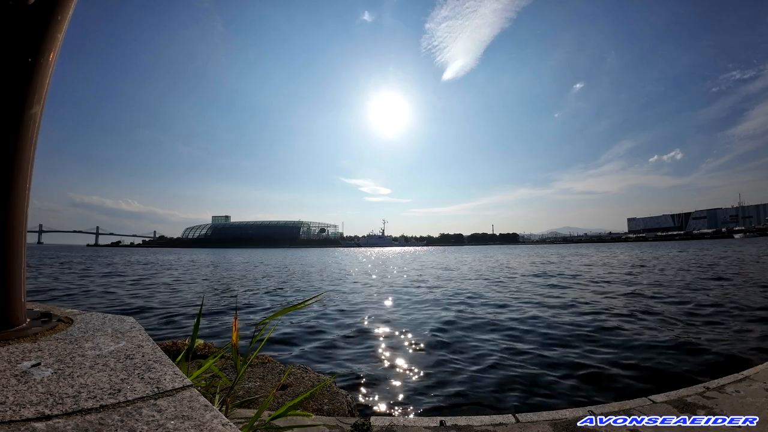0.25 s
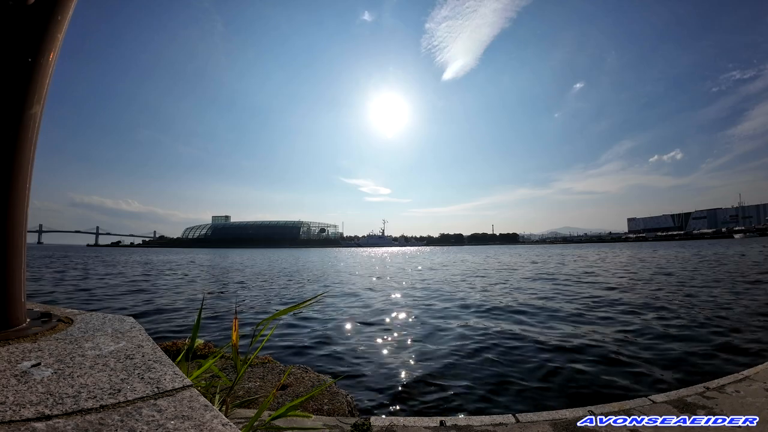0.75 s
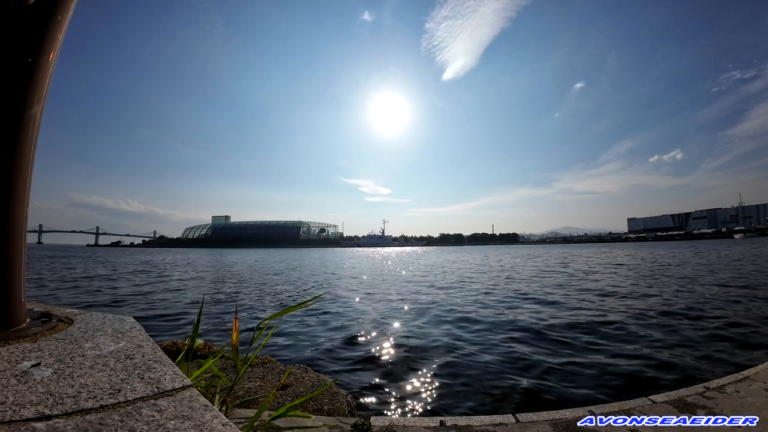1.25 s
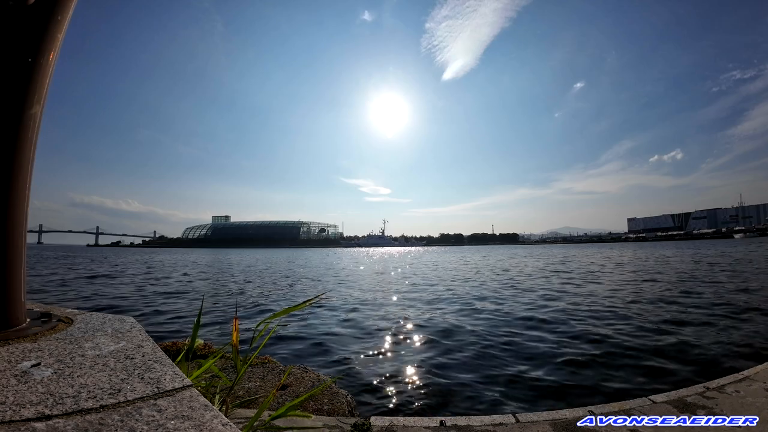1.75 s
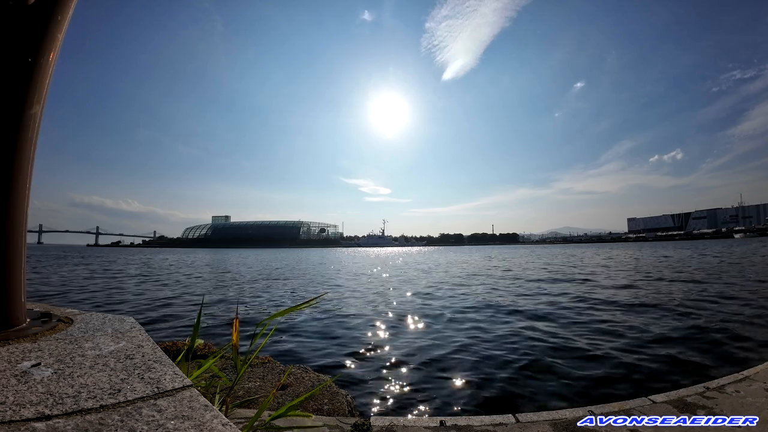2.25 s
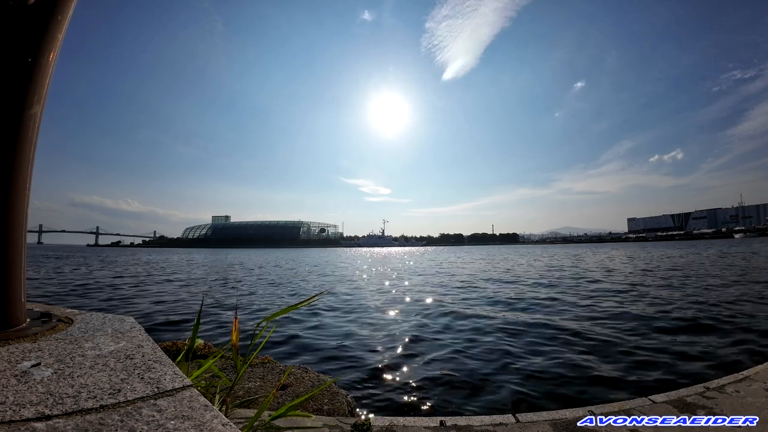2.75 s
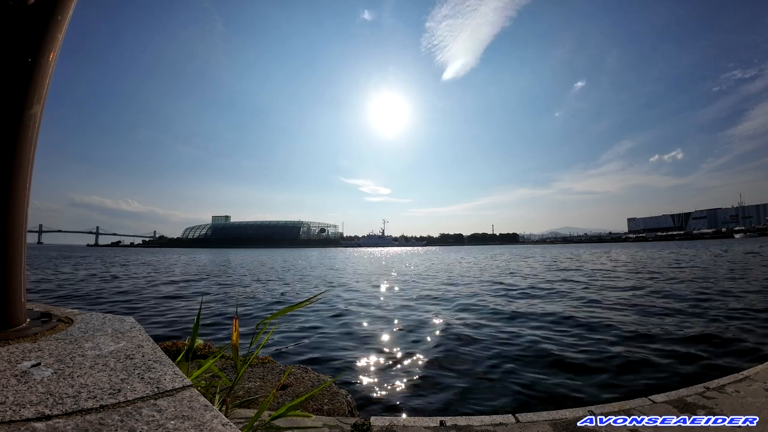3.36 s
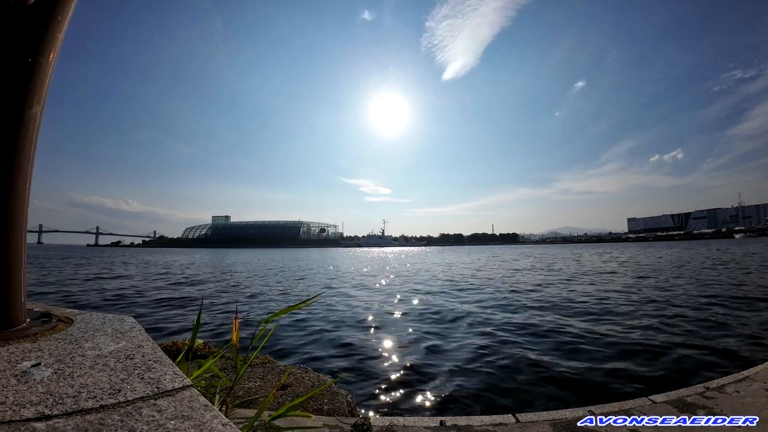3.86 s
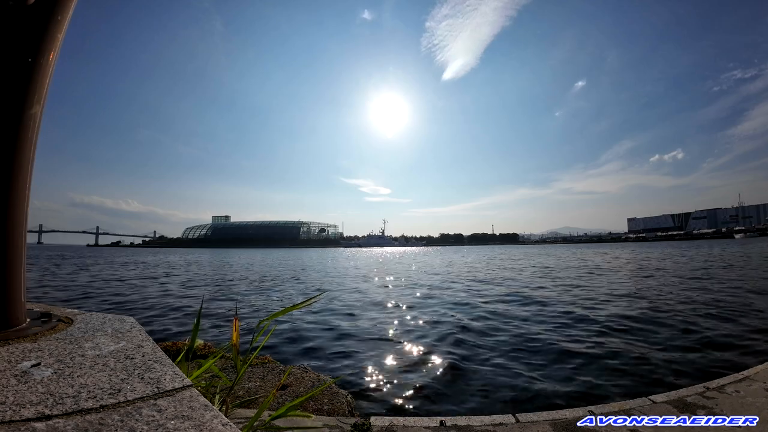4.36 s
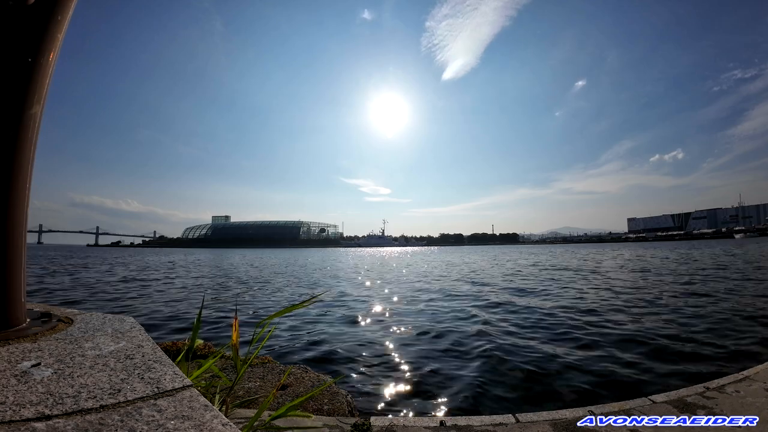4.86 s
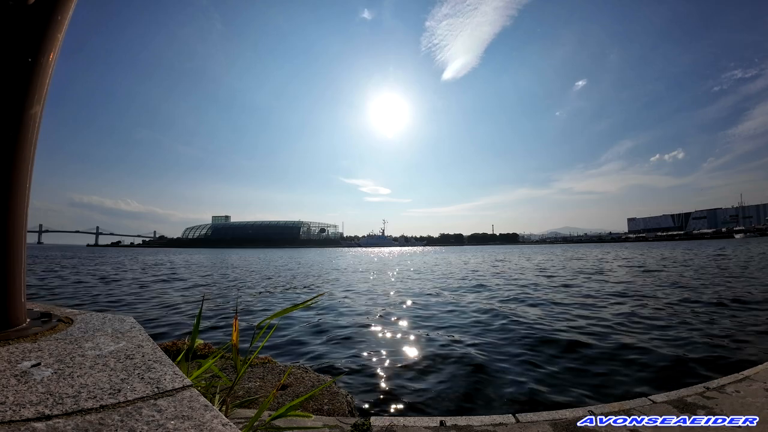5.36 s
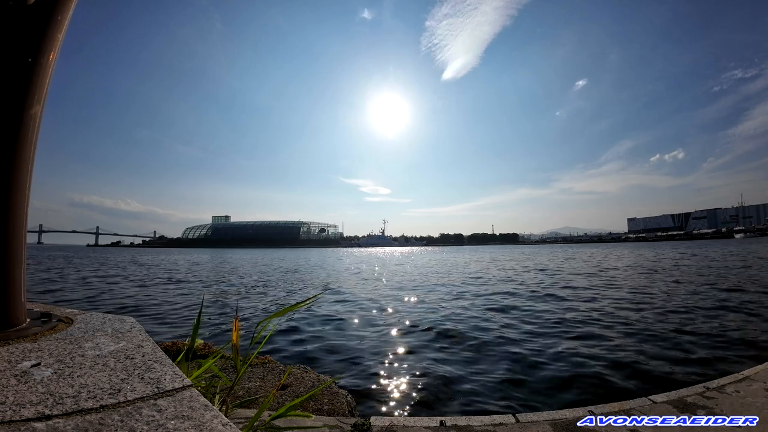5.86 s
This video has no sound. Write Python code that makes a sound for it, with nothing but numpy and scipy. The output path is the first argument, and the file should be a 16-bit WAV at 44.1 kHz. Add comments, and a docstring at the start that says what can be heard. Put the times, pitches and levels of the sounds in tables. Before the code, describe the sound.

Throughout six seconds, distant ship engines hold a deep, slowly beating hum under a dark, wide port roar, with a faint hollow low note swelling in the first two seconds. Close by, water gurgles almost inaudibly along stone. A small bubbly lap opens the scene, and fine drops tick at 0.7-0.9. Far off, a bird of prey whistles from 0.35, flicking up and holding a pure high tone until about 1.0, then warbling in quick arches until 2.3. Faint buzzy chips from a small bird come at 0.3, 0.65, 1.5, 1.75 and 2.35. Ripples and rounder plops return at 2.3-2.8; the busiest splashing is 3.45-4.0, with lighter laps near 4.2, 4.4 and 4.7 and a spattering one at 5.1-5.5. Soft wind puffs rumble on the microphone, notably at 0.9, 2.3-2.7, 3.7 and most strongly 5.65. Open air, little echo, drone continuing to the end.

```python
"""A quiet harbour quay. Far ship engines drone as steady low tones that beat, under the port's dark noise roar.
Ripples lap the stone as swarms of ringing bubbles, and throw small drops made of short band-passed splats.
Light air brushes the microphone as a lumpy rumble, unlike in the two ears. Far off a bird of prey gives
one long pure whistle that breaks into a warble, and a small bird chips a few times in buzzy tones."""
import sys
import numpy as np
from scipy import signal
from scipy.fft import rfft, irfft
from scipy.io import wavfile
from scipy.ndimage import uniform_filter1d

SR = 44100
rng = np.random.default_rng(int(sys.argv[2]) if len(sys.argv) > 2 else 0)


def file_out(sig):
    """Save sig as 16-bit WAV at sys.argv[1]."""
    # one column per channel
    cols = np.atleast_2d(sig).T
    # limit, then scale
    lim = np.clip(cols, -1, 1)
    pcm = np.round(lim * 32767).astype(np.int16)
    wavfile.write(sys.argv[1], SR, pcm)


N = 269010
TIME = np.arange(N) / SR
EDGE_HZ = 15700  # upper band limit of the whole scene

# Ripples reaching the wall. Each row: start in seconds, length in seconds, level of the bubbles in dB before
# the trim in laps(), middle pitch of the bubbles in Hz, level of the spray in dB before the trim in spray().
RIPPLES = [(-.05, 0.17, -67.5, 2860, -75), (0.14, 0.2, -73, 2450, -91), (0.679, .27, -72, 3100, -72),
           (2.294, .2, -67.5, 2200, -86), (2.478, .34, -79.5, 2700, -83), (3.455, .28, -73, 3050, -74),
           (3.767, 0.27, -72, 3130, -68), (4.179, .2, -71, 1870, -91), (4.411, 0.28, -73.5, 3200, -88),
           (4.666, .2, -71.5, 2900, -77), (5.12, .4, -73, 3220, -72)]
# Where drops fall. Each row: pitch in Hz, left minus right in dB; the finest fall to the right.
DROP_PLACES = [(2500, -0.5), (4500, 1), (8000, -3.5)]


def gain_of(db):
    """Decibels to amplitude."""
    return 10 ** (np.asarray(db) / 20)


def evened(x):
    """Scales to rms 1."""
    return x / np.sqrt(np.mean(x ** 2) + 1e-20)


def curve(points, t=TIME):
    """Reads a control curve over time."""
    return np.interp(t, *np.transpose(points))


def read(points, hz):
    """Reads a spectrum on a log-frequency axis."""
    f, value = np.transpose(points)
    return np.interp(np.log(hz + 1), np.log(f + 1), value)


def shaped(x, points):
    """Filters a sound by a spectrum in dB, leaving phase alone."""
    return irfft(rfft(x) * gain_of(read(points, np.fft.rfftfreq(N, 1 / SR))), N)


def drift(hz):
    """Slow random motion of rms 1, up to about hz changes a second."""
    f = np.fft.rfftfreq(N, 1 / SR)
    low_pass = np.exp(-.5 * (f / hz) ** 2) * (f > 0)
    return evened(irfft(rfft(rng.standard_normal(N)) * low_pass, N))


def band(x, hz, octaves):
    """Band-pass that reaches the given octaves to either side of hz, within 20 Hz to 12 kHz."""
    edges = np.clip([hz / 2 ** octaves, hz * 2 ** octaves], [20, 40], [11000, 12000])
    return signal.sosfilt(signal.butter(2, edges, "bandpass", fs=SR, output="sos"), x)


def panned(x, side_db):
    """Places a sound by its level difference, left minus right."""
    return x * gain_of([[side_db / 2], [-side_db / 2]])


def add(mix, s, sound):
    """Mixes a sound in at time s, trimming what falls outside."""
    start = round(s * SR)
    sound = sound[..., max(-start, 0):]
    part = mix[..., max(start, 0):][..., :sound.shape[-1]]
    part += sound[..., :part.shape[-1]]


def engines(wander_hz=0.075, throb_depth=0.88, flutter_db=0.6, side_db=-1.9):
    """Near-steady engine tones whose sum beats; the first one also throbs."""
    # Engine tones, strongest first. Each row: pitch in Hz, level in dB.
    tones = [(58.6, -35.5), (44.44, -43), (40.4, -48), (60.3, -49), (56.3, -54.5), (141, -60.5),
             (162.5, -62)]
    # Slow swell of the strongest tone. Each row: time in seconds, level in dB; only its shape about the mean
    # counts, scaled by throb_depth.
    throb = [(0, -37.5), (.35, -34.5), (.95, -37.5), (1.15, -35.5), (2.9, -37), (3.25, -31), (3.52, -40),
             (3.9, -35), (4.25, -38), (4.8, -34), (5.15, -37.5), (5.8, -40), (6.0, -32)]
    throb_db = curve(throb)
    out = np.zeros((2, N))
    for k, (hz, db) in enumerate(tones):
        turns = np.cumsum(hz + wander_hz * drift(0.81)) / SR + rng.random()
        tone = evened(np.sin(2 * np.pi * turns))
        swell_db = 0
        if k == 0:
            swell_db = throb_depth * (throb_db - throb_db.mean()) + flutter_db * drift(9.7)
        lean_db = side_db if hz < 100 else 0  # deep tones lean right
        out += panned(gain_of(db + swell_db) * tone, lean_db)
    return out


def pipe_note(hz=178, width_hz=4.8):
    """A hollow note in the rumble: a tone whose amplitude and phase wander like narrow-band noise."""
    # Each row: time in seconds, level in dB.
    boom = [(0, -57), (.5, -48), (1.3, -54), (1.75, -46.5), (2.2, -56.5), (2.5, -62), (6.1, -73)]
    turn = 2 * np.pi * hz * TIME
    pipe = np.sin(turn) * drift(width_hz) + np.cos(turn) * drift(width_hz)
    return panned(evened(pipe) * gain_of(curve(boom)), 0)


def roar(level_db=-40.5, patchy_db=1.0, bass_side_db=0.5):
    """Far traffic and machinery: dark noise, its bass alike in both ears, whose rumble and middle swell apart."""
    # Tone of the roar. Each row: frequency in Hz, relative density in dB per Hz.
    tilt = [(12, -13), (50, -6), (90, -5), (150, -13.5), (320, -19), (440, -25.5), (900, -32.5),
            (1900, -44), (2500, -47.5), (3400, -52), (4300, -59.5), (5200, -57), (6900, -66), (15000, -73)]
    # Swell of the low rumble. Each row: time in seconds, level in dB; only its shape about the mean counts.
    rumble = [(0, -46.5), (.45, -44), (1.5, -46.5), (1.85, -44.5), (2.3, -46.5), (3.4, -50), (4.6, -48),
              (6.1, -49)]
    # Swell of the distant traffic. Each row: time in seconds, level in dB; only its shape about the mean counts.
    traffic = [(0, -59), (.9, -58.5), (1.7, -60.5), (2.7, -59.5), (3.3, -61), (3.6, -59), (5.3, -58.5),
               (5.7, -61), (6.1, -60)]
    # Stereo width. Each row: frequency in Hz, side minus mid in dB.
    width = [(40, -15.5), (80, -18.5), (150, -27), (250, -28), (500, -20), (1000, -17), (2000, -11),
             (4000, -3.5), (7000, 1)]
    hz = np.fft.rfftfreq(4096, 1 / SR)
    t = np.arange(N // 1024 + 5) * 1024 / SR
    a, b, c, d, patches = rng.standard_normal((5, len(hz), len(t)))
    patches = uniform_filter1d(uniform_filter1d(patches, size=30, axis=0), size=6, axis=1)
    field_db = read(tilt, hz)[:, None] + patchy_db * evened(patches)

    # how far each swell reaches: (Hz, share of the swell)
    rumble_reach = [(50, 0.22), (150, 1), (260, 0.81), (700, 0.031)]
    traffic_reach = [(300, 0.097), (900, 0.6), (2200, 1.0), (6000, 0.74)]
    for points, reach in ((rumble, rumble_reach), (traffic, traffic_reach)):
        swell_db = curve(points, t)
        field_db = field_db + read(reach, hz)[:, None] * (swell_db - swell_db.mean())

    mid = a + 1j * b
    side = (c + 1j * d) * gain_of(read(width, hz))[:, None]
    spectra = np.array([mid + side, mid - side]) * gain_of(field_db)
    lean_db = read([(60, bass_side_db), (160, .2)], hz)
    spectra *= gain_of(np.outer([.5, -.5], lean_db))[:, :, None]
    noise = signal.istft(spectra, nperseg=4096, noverlap=3072)[1][:, :N]
    return gain_of(level_db) * evened(noise)


def drop(hz, octaves, swell_s=.00085, apart=0.76):
    """One drop: a splat that swells and dies in milliseconds, ringing longer the narrower it is."""
    t = np.arange(1024) / SR
    trickle = gain_of(-23) * np.exp(-t / .006)
    splat = rng.standard_normal((3, len(t))) * (t / swell_s * np.exp(-t / swell_s) + trickle)
    unlike = np.clip(apart * hz / 6000, 0, 1)  # the ears differ more for short waves
    both_ears = np.sqrt(1 - unlike ** 2) * splat[0] + unlike * splat[1:]
    sound = band(both_ears, hz, 0.035 + max(octaves, 0))
    return sound / np.sqrt(np.mean(sound[:, :220] ** 2))  # rms 1 over the first 5 ms


def drops():
    """The larger drops against the stone, close to the microphone."""
    # Each row: start in seconds, level in dB, pitch in Hz, spread in octaves to either side before the
    # small minimum that drop() adds.
    loud_drops = [(.052, -64.5, 3780, 0.29), (0.71, -59.5, 8700, .53), (0.767, -67, 7490, .6),
                  (.787, -60.5, 3030, 0.3), (0.845, -66, 6200, .48), (.882, -63, 9700, .1),
                  (0.893, -60, 9400, .2), (.924, -68, 3330, .3), (1.65, -63.5, 3000, 0.26),
                  (1.713, -75, 11500, .15), (2.423, -56, 2150, 0.11), (2.463, -60, 1690, .12),
                  (2.548, -61, 2350, 0.096), (2.743, -59, 4030, .37), (2.985, -71, 4960, .22),
                  (3.124, -64, 2800, 0.23), (3.292, -68, 3940, .25), (3.476, -58, 2260, 0.19),
                  (3.503, -73, 6760, .4), (3.56, -59, 3350, .13), (3.568, -68, 5000, 1.2),
                  (3.605, -53.5, 2960, 0.19), (3.668, -58, 5700, .39), (3.673, -56, 2310, 0.54),
                  (3.677, -57.5, 4460, .2), (3.684, -63, 8180, 0.25), (3.814, -56.5, 2580, 0.38),
                  (3.858, -62.5, 8260, 0.094), (3.914, -61, 5350, 0.14), (3.933, -64, 4460, .4),
                  (3.948, -67, 6740, 0.56), (4.021, -70, 5630, 0.7), (4.221, -59.5, 2150, 0.077),
                  (4.436, -70, 5930, 0.35), (4.822, -67, 4840, .44), (5.144, -64, 4940, .4),
                  (5.182, -67.5, 8220, 0.35), (5.295, -62, 9300, 0.19), (5.337, -60.5, 3550, 0.97),
                  (5.354, -66, 4960, .3), (5.388, -59, 3800, 0.24), (5.649, -69.5, 5600, .44)]
    out = np.zeros((2, N))
    for s, db, hz, octaves in loud_drops:
        add(out, s, panned(gain_of(db) * drop(hz, octaves), read(DROP_PLACES, hz)))
    return out


def spray(hz=5600, pitch_spread=.55, octaves=0.54, size_spread_db=2.0, shrink_db=3, trim_db=-3.0, count=18):
    """Each ripple throws a handful of fine drops that land while it lasts; the higher ones are softer."""
    out = np.zeros((2, N))
    for s, length, _, _, db in RIPPLES:
        places = (np.arange(count) + rng.random(count)) / count
        looks = np.clip(rng.standard_normal((count, 2)), -1.5, 1.5)
        for place, (size, pitch) in zip(places, looks):
            drop_hz = hz * 2 ** (pitch_spread * pitch)
            drop_db = db + trim_db + size_spread_db * size - shrink_db * pitch
            sound = gain_of(drop_db) * drop(min(drop_hz, EDGE_HZ * 2 / 3), octaves)
            add(out, s + place * length, panned(sound, read(DROP_PLACES, drop_hz)))
    return out


def bubble(hz, cycles=3.4):
    """A tiny bubble: a few cycles that swell softly and die."""
    turns = np.arange(600) * min(hz, EDGE_HZ * .7) / SR
    return np.sin(2 * np.pi * turns) * np.exp(-turns / cycles) * (1 - np.exp(-turns / 0.44))


def laps(per_s=650, size_spread_db=3, pitch_spread=0.723, shrink_db=2.5, trim_db=2.5):
    """Each ripple breaks on the stone into a swarm of tiny bubbles; the smaller ones ring higher and softer."""
    out = np.zeros((2, N))
    for s, length, db, hz, _ in RIPPLES:
        swarm = np.zeros((2, round(length * SR)))
        count = round(per_s * length)
        for place, (size, pitch, side) in zip(rng.random(count), rng.standard_normal((count, 3))):
            size_db = size_spread_db * min(size, 2) - shrink_db * max(pitch, 0)
            sound = gain_of(size_db) * bubble(hz * 2 ** (pitch_spread * pitch))
            add(swarm, place * length, panned(sound, 4 * side))
        swarm = swarm * signal.windows.tukey(swarm.shape[1], .6)
        add(out, s, gain_of(db + trim_db) * evened(swarm))
    return out


def gurgle(level_db=-75, hz=2200, pitch_spread=.5, shrink_db=3, count=600):
    """Further along the wall the water never quite rests: faint scattered plips."""
    out = np.zeros((2, N))
    looks = np.clip(rng.standard_normal((count, 3)), -2, 2)
    for place, (size, pitch, side) in zip(rng.random(count), looks):
        plip_db = 10.0 * size - shrink_db * pitch
        plip = gain_of(plip_db) * bubble(hz * 2 ** (pitch_spread * pitch), cycles=6.4)
        add(out, place * TIME[-1], panned(plip, 3 * side))
    return gain_of(level_db) * evened(out)


def breeze(calm_db=-48.5):
    """Light air on each microphone port: a lumpy rumble, unrelated between the ears, that swells with each puff."""
    # Puffs of air. Each row: time of the peak in seconds, length in seconds, level in dB added to the calm.
    gusts = [(.5, 0.33, -43), (.9, .4, -39.5), (1.605, 0.39, -43), (2.264, 0.42, -39), (2.723, 0.16, -37),
             (3.673, 0.29, -38.5), (5.047, 0.52, -45), (5.656, 0.34, -33.5), (5.926, .2, -40)]
    # Tone of the buffeting. Each row: frequency in Hz, relative density in dB per Hz.
    buffet = [(8, -1), (28, 3.5), (50, -0.5), (100, -20), (170, -34.5), (400, -47), (1500, -75.5)]
    air = shaped(rng.standard_normal((2, N)), buffet)
    power = np.full(N, gain_of(calm_db) ** 2)
    for s, length, db in gusts:
        power += gain_of(db) ** 2 * np.exp(-2 * np.pi * ((TIME - s) / length) ** 2)
    return evened(air) * np.sqrt(power)


def warble_note(s, db, crest_hz=2850, trough_hz=2430, rise_s=.042, fall_s=.038):
    """One arch in pitch, loudest late in its rise: rows of (s, Hz, dB)."""
    late_rise_hz = crest_hz - (crest_hz - trough_hz) / 4
    return [(s - rise_s, trough_hz, db - 6.5), (s - rise_s / 3, late_rise_hz, db + 1),
            (s, crest_hz, db - 7), (s + fall_s, trough_hz, db - 7)]


def raptor():
    """One pure tone: a flick up, a long hold, a drop, then a warble of notes that are loudest as they rise."""
    # The long whistle. Each row: time in seconds, pitch in Hz, level in dB.
    whistle = [(.345, 2750, -76), (.36, 2870, -63.5), (.38, 3230, -68), (.41, 3080, -70),
               (.47, 3050, -70.5), (.56, 2965, -71.5), (.68, 2945, -69), (.78, 2935, -74),
               (.965, 2950, -72.5)]
    # The warble after it. Each row: time of the pitch crest in seconds, level in dB, 1 dB under the note's peak.
    warble = [(1.05, -67), (1.16, -67), (1.24, -72), (1.335, -70), (1.432, -67), (1.54, -68), (1.636, -67),
              (1.748, -66), (1.842, -68), (1.95, -68), (2.076, -66), (2.18, -66), (2.308, -68)]
    end_s, _, end_db = whistle[-1]
    fall = (end_s + .019, 2430, end_db)  # down to the trough of the warble
    notes = [warble_note(*note) for note in warble]
    s, hz, db = np.vstack([whistle, fall, *notes]).T
    glide = uniform_filter1d(np.interp(TIME, s, hz), size=250)
    pitch = glide * (1 + .004 * drift(60))  # a slight tremble
    gate = uniform_filter1d(1. * (TIME > s[0]) * (TIME < s[-1]), size=300)
    return gate * gain_of(np.interp(TIME, s, db)) * np.sin(2 * np.pi * np.cumsum(pitch) / SR)


def small_bird(buzz_hz=310, buzz_depth=0.07):
    """Short buzzy chips: a tone shaken quickly in pitch."""
    # Each row: start in seconds, length in seconds, middle pitch in Hz, level in dB.
    chips = [(0.31, .045, 4900, -79.5), (.645, 0.053, 4900, -79), (1.496, 0.057, 4420, -72.5),
             (1.75, 0.062, 4860, -79.5), (2.35, 0.027, 4740, -75.5)]
    out = np.zeros(N)
    shake = np.sin(2 * np.pi * buzz_hz * TIME) + 0.55 * drift(200)
    for s, length, hz, db in chips:
        pitch = hz * (1 + buzz_depth * shake[round(s * SR):][:round(length * SR)])
        chip = np.sin(2 * np.pi * np.cumsum(pitch) / SR) * np.hanning(len(pitch))
        add(out, s, gain_of(db) * evened(chip))
    return out


def quay(x, t60):
    """Faint scatter from the wall and the water: noise after a 4 ms gap, falling 60 dB in t60 seconds."""
    t = np.arange(SR // 2) / SR
    tail = rng.standard_normal((2, len(t))) * gain_of(-60 * t / t60) * (t > .004)
    return signal.fftconvolve(x, tail / np.linalg.norm(tail[0]), axes=1)[:, :N]


def scene():
    """Drone and roar behind, water close by, birds far off over open water."""
    port = engines() + pipe_note() + roar()
    water = drops() + spray() + laps() + gurgle()
    water = water + gain_of(-9) * quay(water, t60=0.062)
    birds = panned(raptor() + small_bird(), .5)
    birds = birds + gain_of(-11) * quay(birds, t60=.3)
    return port + water + breeze() + birds


def record(dry):
    """Short end fades, microphone colour, then a steep low-pass as the band limit."""
    # Microphone colour. Each row: frequency in Hz, gain in dB.
    mic_colour = [(7800, -0.5), (8900, -3.5), (10100, 1), (11200, -1.5), (12400, -11), (15500, -4)]
    coloured = shaped(dry * signal.windows.tukey(N, .002), mic_colour)
    low_pass = signal.firwin(511, EDGE_HZ, window=("kaiser", 9), fs=SR)
    return signal.oaconvolve(coloured, low_pass[None], "same")


dry = scene()
out = record(dry)
file_out(out)
```